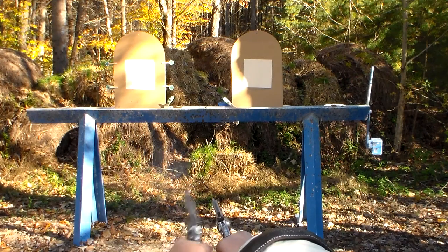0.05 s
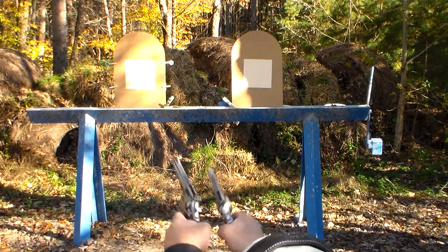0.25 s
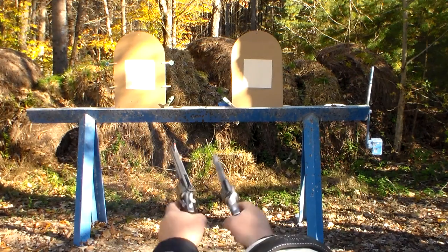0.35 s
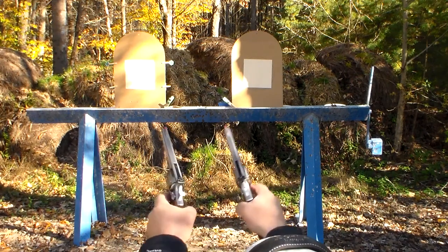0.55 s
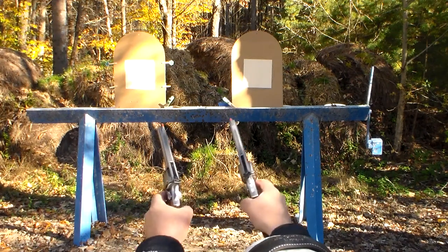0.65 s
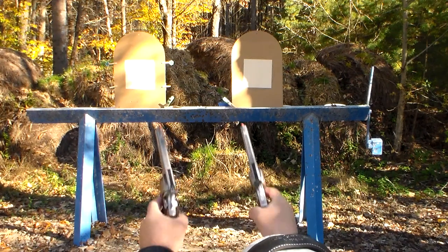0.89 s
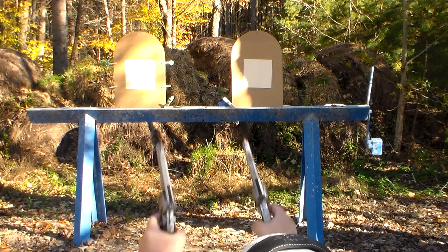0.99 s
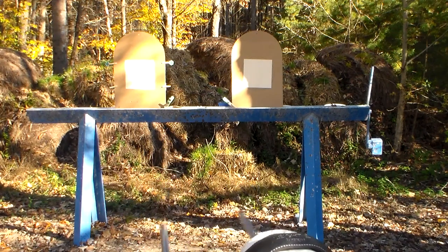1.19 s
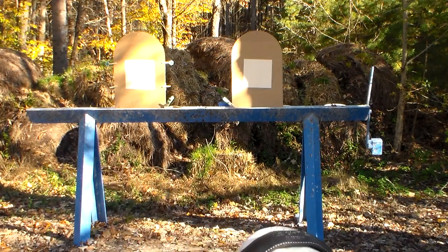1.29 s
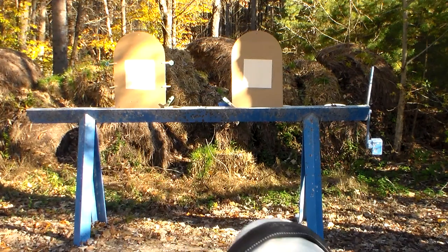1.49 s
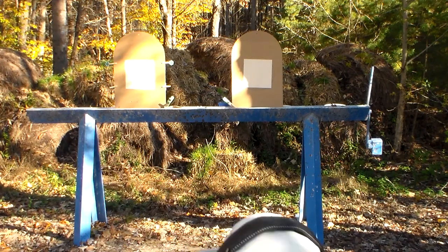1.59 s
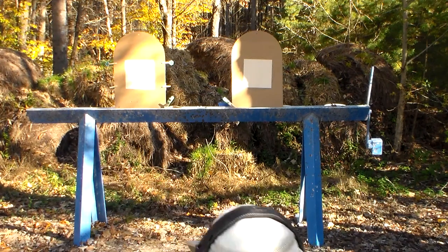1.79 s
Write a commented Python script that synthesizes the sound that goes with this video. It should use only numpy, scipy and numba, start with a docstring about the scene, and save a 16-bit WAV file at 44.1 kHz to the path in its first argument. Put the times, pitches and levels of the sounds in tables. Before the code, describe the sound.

Two revolver shots crack almost together outdoors, followed by a dull rolling echo.

```python
"""Two revolvers fire almost together at an outdoor range, an arm's length from the microphone.
Each blast, a muzzle wave plus gas roar, overloads the input, slaps back from the earth berm
and scatters away through the woods. The gain control ducks, holds, then recovers as a dull echo
rolls in from far slopes. The guns are put away with faint rustles, ticks and one steel clink."""
import sys
import numpy as np
from scipy import signal
from scipy.fft import rfft, irfft, next_fast_len
from scipy.io import wavfile
from numba import njit

SR = 44100
rng = np.random.default_rng(int(sys.argv[2]) if len(sys.argv) > 2 else 0)


def waveform_to_disk(signal):
    """Save audio, clipped to [-1, 1], as 16-bit WAV at the path in sys.argv[1]."""
    frames = np.transpose(np.atleast_2d(signal))
    scaled = np.clip(frames, -1, 1) * 32767
    samples = np.round(scaled).astype(np.int16)
    wavfile.write(sys.argv[1], SR, samples)


N = 81585

# Each row: start in seconds, blast level in dB, woods echo level in dB.
SHOTS = [(0.2011, 38.5, 22), (0.2430, 31.5, 25.5)]


def undb(db):
    """Decibels to gain."""
    return 10 ** (np.asarray(db) / 20)


def since(start_s):
    """Seconds since start_s, and a gate that opens there."""
    age_s = np.arange(N) / SR - start_s
    return np.maximum(age_s, 0), age_s >= 0


def bins_hz():
    """FFT bin frequencies, floored at 1 Hz."""
    return np.maximum(np.fft.rfftfreq(next_fast_len(N), 1 / SR), 1)


def colour(points):
    """Gain per bin from (Hz, dB) points."""
    hz, db = np.array(points, float).T
    return undb(np.interp(np.log(bins_hz()), np.log(hz), db))


def resonance(centre_hz, width):
    """Band-pass gain per bin; width is 1/Q."""
    return 1 / np.hypot(1, (bins_hz() / centre_hz - centre_hz / bins_hz()) / width)


def shape(x, gain):
    """Filter by a gain per bin."""
    return irfft(rfft(x, next_fast_len(N)) * gain, next_fast_len(N))[..., :N]


def noise(gain):
    """Stereo noise of rms 1, narrow in the bass, wide in the treble."""
    # Each row: frequency in Hz, side minus mid in dB.
    stereo_width = [(60, -10), (150, -15.5), (370, -22.5), (700, -17.5), (1300, -14), (2400, -10),
                    (4300, -5), (8000, 0.5), (14000, 1.5)]
    mid, side = rng.standard_normal((2, N))
    x = shape(mid, gain) + shape(side, gain * colour(stereo_width)) * np.array([[1], [-1]])
    return x / np.std(x)


def wander(rate_hz):
    """Random curve with a spread near 1."""
    return 1.3 * np.interp(np.arange(N) / SR * rate_hz, np.arange(4096), rng.standard_normal(4096))


def echo_noises(gain):
    """One noise per shot: the same bass, delayed to each start, and unrelated treble."""
    crossover_hz = 1700
    common = noise(gain)
    share = 1 / (1 + (bins_hz() / crossover_hz) ** 2)
    delayed = [np.roll(common, int(start_s * SR), axis=1) for start_s, _, _ in SHOTS]
    return [shape(x, share ** .5) + shape(noise(gain), (1 - share) ** .5) for x in delayed]


def outdoor_air():
    """Quiet, steady outdoor background."""
    # Each row: frequency in Hz, relative density in dB.
    spectrum = [(15, -9), (28, -15.5), (100, -4), (180, -23), (320, -17.5), (800, -22.5), (1300, -18),
                (2000, -28), (3200, -38.5), (6000, -44), (14000, -49), (15000, -58)]
    return undb(-42.5) * noise(colour(spectrum))


def handling():
    """Sleeves and leather rustle; guns and holsters tick."""
    # Each row: time in seconds, level in dB.
    rustle_levels = [(0.9, -55), (1.12, -52.5), (1.2, -56), (1.28, -53), (1.368, -58), (1.38, -45.5),
                     (1.44, -49.5), (1.52, -56.5), (1.85, -59)]
    # Each row: frequency in Hz, relative density in dB.
    rustle_spectrum = [(1000, -41.5), (3500, 2), (6500, 0.5), (10000, -2.5), (14000, -6.5), (15000, -30)]
    # Each row: start in seconds, level in dB, centre in Hz, width as 1/Q.
    ticks = [(1.031, -41, 7618, .06), (1.082, -50, 7000, .4), (1.132, -47, 10000, .3),
             (1.211, -47, 12000, .3), (1.266, -38, 8000, 0.64), (1.332, -43, 5460, 0.27),
             (1.377, -37, 9000, .5), (1.497, -38.5, 5500, .5), (1.536, -45, 10000, .2),
             (1.611, -46, 4000, .3), (1.651, -45.5, 9163, .04)]
    grain_db, tick_decay_s = 1.5, 0.0024
    rustle_db = np.interp(np.arange(N) / SR, *np.array(rustle_levels).T)
    _, on = since(rustle_levels[0][0])
    out = noise(colour(rustle_spectrum)) * undb(rustle_db + grain_db * wander(rate_hz=500)) * on
    for start_s, db, hz, width in ticks:
        age_s, on = since(start_s)
        out += undb(db) * noise(resonance(hz, width)) * on * np.exp(-age_s / tick_decay_s)
    return out


def clink():
    """One revolver's steel rings briefly as it drops into its holster."""
    # Each row: frequency in Hz, level in dB, decay in seconds.
    modes = [(4080, -38, .005), (4330, -42, 0.0035), (6100, -44, .008)]
    age_s, _ = since(start_s=1.376)
    return sum(undb(db) * np.sin(2 * np.pi * hz * age_s) * np.exp(-age_s / decay_s)
               for hz, db, decay_s in modes)


def slope_echo():
    """Dull echoes of both shots build up from far slopes and roll away."""
    # Each row: frequency in Hz, relative density in dB.
    spectrum = [(60, -18), (200, -20), (300, -14), (420, 0.5), (600, -0.5), (950, -6.5), (1800, -9.5),
                (2700, -24), (4500, -45), (9000, -64)]
    # Each row: peak time in seconds, level in dB, rise in seconds, fall in dB per second.
    swells = [(1.071, -23, 0.28, 54), (1.33, -28.5, 0.065, 28.5)]
    power = 0
    for peak_s, db, rise_s, fall_db_per_s in swells:
        lag_s = np.arange(N) / SR - peak_s
        build_up = np.exp(-(np.minimum(lag_s, 0) / rise_s) ** 2)
        power += build_up * undb(db - fall_db_per_s * np.maximum(lag_s, 0)) ** 2
    _, on = since(SHOTS[0][0])
    return sum(echo_noises(colour(spectrum))) * np.sqrt(power / len(SHOTS)) * on


def woods_echo():
    """Trunks scatter the shots; later echoes have come further and are weaker and duller."""
    # Each row: frequency in Hz, relative density in dB.
    spectrum = [(30, -17), (100, -18.5), (200, -16), (400, -1), (650, 0.5), (1000, -3), (2000, -2.5),
                (3800, -6.5), (6000, -11.5), (9000, -10.5), (14000, -15)]
    spread_s, spread_exponent, flicker_db = 0.09, 2.16, .6
    air_db_per_s, air_exponent = 3, 1.503  # absorption at 1 kHz, growth with frequency
    octaves, centres = np.log2(bins_hz() / 1000), np.linspace(-2, 4, 7)
    out = 0
    for (start_s, _, db), scatter in zip(SHOTS, echo_noises(colour(spectrum))):
        age_s, on = since(start_s)
        envelope = on * undb(db + flicker_db * wander(rate_hz=70))
        envelope /= (1 + age_s / spread_s) ** spread_exponent
        for centre, weights in zip(centres, np.eye(len(centres))):
            band = shape(scatter, np.interp(octaves, centres, weights))
            absorbed_db = air_db_per_s * 2 ** (centre * air_exponent) * age_s
            out += band * envelope * undb(-absorbed_db)
    return out


def bias_jolts():
    """Overload throws the microphone's bias off; it creeps back and overshoots: a deep thump."""
    # Each row: start in seconds, signed size in full scales.
    jolts = [(0.2009, -14), (0.207, 35), (0.224, -27), (0.2690, 16.5)]
    rise_s, decay_s = .003, .05
    overshoot, overshoot_s, capsule_mismatch = 0.065, 0.24, 0.23
    out = 0
    for start_s, size in jolts:
        age_s, _ = since(start_s)
        settle = np.exp(-age_s / decay_s) - overshoot * np.exp(-age_s / overshoot_s)
        capsule_gains = 1 + capsule_mismatch * rng.uniform(-1, 1, (2, 1))
        out += size * capsule_gains * (1 - np.exp(-age_s / rise_s)) * settle
    return out


def blasts():
    """Each muzzle wave pushes, then sucks; powder gas roars; nearby surfaces slap back."""
    # Each row: frequency in Hz, relative density in dB.
    gas_spectrum = [(40, -0.5), (150, -16), (400, -8), (1000, -3), (2000, -2), (4000, -3.5), (8000, -9),
                    (14000, -18.5)]
    # Direct, ground, leaf litter, target stand, berm twice.
    # Each row: delay in seconds, gain in dB, decay in seconds, centre in Hz, width as 1/Q.
    paths = [(0, 5, 0.0014, 3000, 1.5), (.0045, 0.5, 0.0018, 850, .7), (.0075, -2, 0.0037, 3800, 1.2),
             (0.0158, -5, .004, 2200, .8), (0.0247, 3.5, 0.0024, 440.4, 0.23),
             (0.0274, 1, 0.0021, 445, 0.39)]
    push_s, push_gain_db = 0.0012, 5.5
    gas_decay_s, gas_gain_db = 0.035, -13
    gas = colour(gas_spectrum)
    out = 0
    for start_s, db, _ in SHOTS:
        age_s, on = since(start_s)
        muzzle_wave = undb(push_gain_db) * (1 - age_s / push_s) * np.exp(-age_s / push_s)
        roar = undb(gas_gain_db) * noise(gas) * np.exp(-age_s / gas_decay_s)
        out += undb(db) * on * (muzzle_wave + roar)
    for delay_s, path_db, decay_s, hz, width in paths:
        for (start_s, db, _), slap in zip(SHOTS, echo_noises(gas * resonance(hz, width))):
            age_s, on = since(start_s + delay_s)
            out += undb(db + path_db) * on * slap * np.exp(-age_s / decay_s)
    return out


def scene():
    """Shots, echoes and handling over a quiet background."""
    return blasts() + woods_echo() + slope_echo() + bias_jolts() + handling() + clink() + outdoor_air()


@njit
def gain_control(peak, min_gain, hold_s, release_s):
    """Gain drops at once on overload, holds, then recovers."""
    out, gain, wait_s = np.empty(len(peak)), 1., 0.
    for i in range(len(peak)):
        target = max(min_gain, 1 / (peak[i] + 1e-9))
        if target < gain:
            gain, wait_s = target, hold_s
        wait_s -= 1 / SR
        if wait_s < 0:
            gain += (1 - gain) / (release_s * SR)
        out[i] = gain
    return out


def record(dry):
    """The input ducks, still saturates on the blasts, adds its own hiss and cuts the top."""
    ceiling, knee, hiss_db, cutoff_hz = .98, 6.0, -69, 14500
    peak = np.abs(dry).max(axis=0)
    ducked = dry * gain_control(peak, min_gain=float(undb(-26)), hold_s=0.7, release_s=0.34)
    saturated = ducked / (1 + np.abs(ducked / ceiling) ** knee) ** (1 / knee)
    hiss = undb(hiss_db) * rng.standard_normal(dry.shape)
    lowpass = signal.ellip(8, .2, 70, cutoff_hz, fs=SR, output="sos")
    return signal.sosfilt(lowpass, saturated + hiss)


dry = scene()
out = record(dry)
waveform_to_disk(out)
```